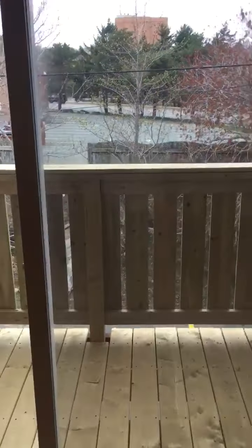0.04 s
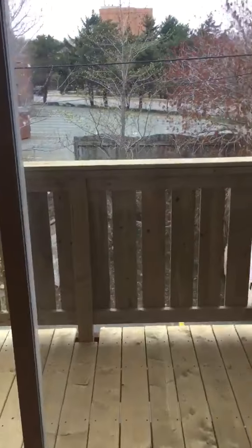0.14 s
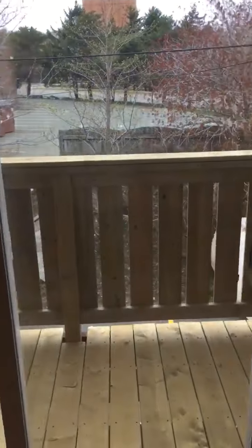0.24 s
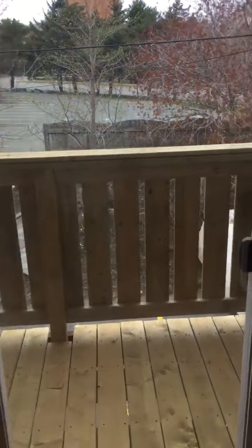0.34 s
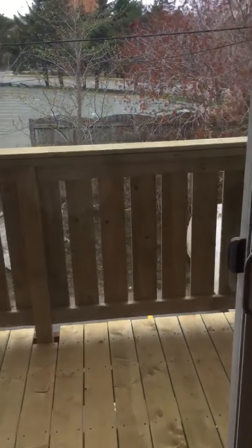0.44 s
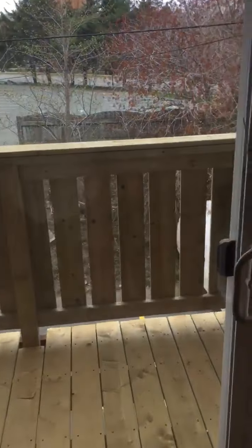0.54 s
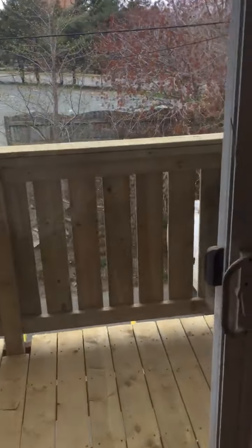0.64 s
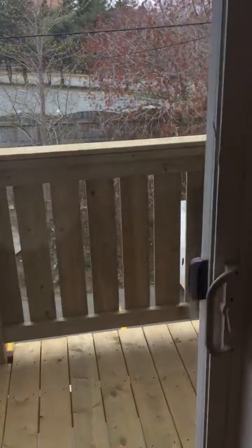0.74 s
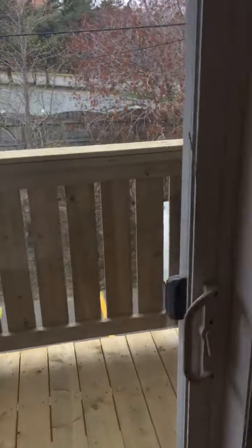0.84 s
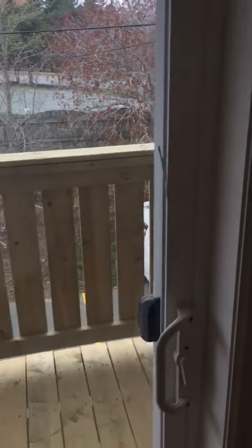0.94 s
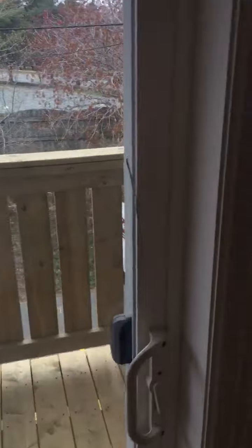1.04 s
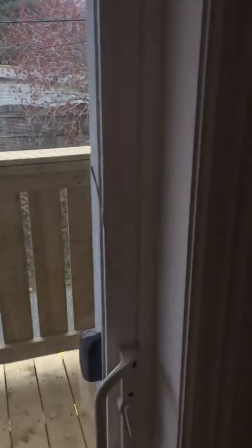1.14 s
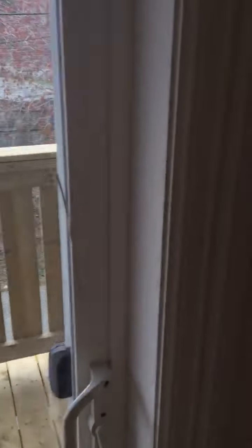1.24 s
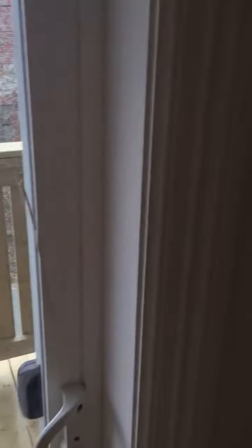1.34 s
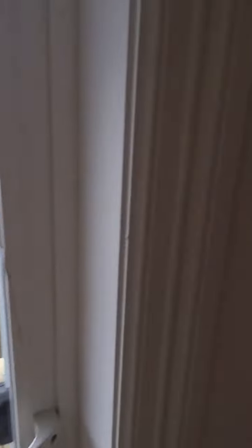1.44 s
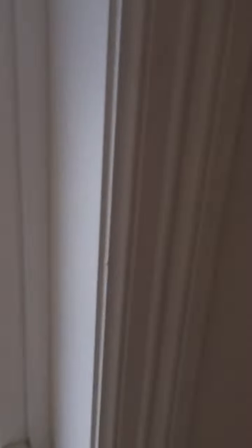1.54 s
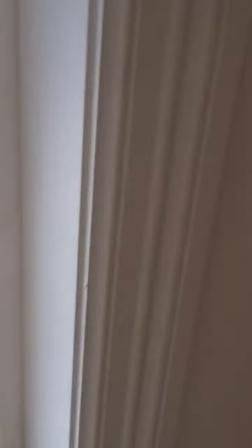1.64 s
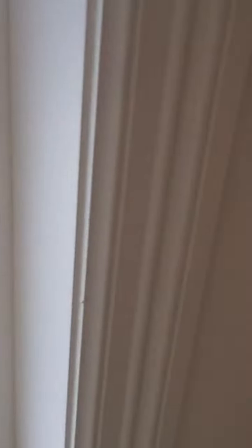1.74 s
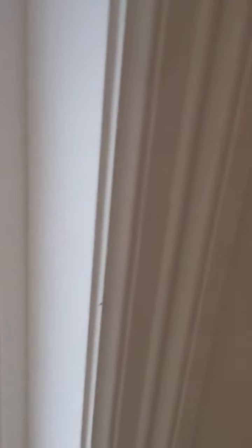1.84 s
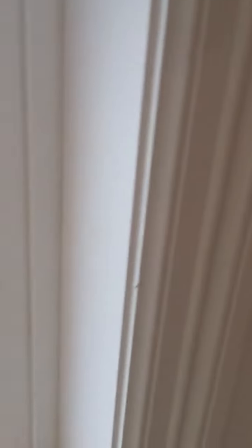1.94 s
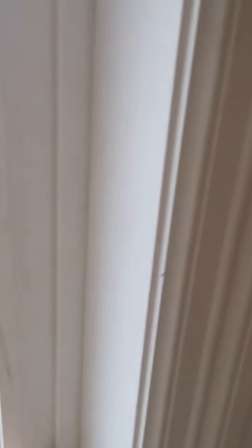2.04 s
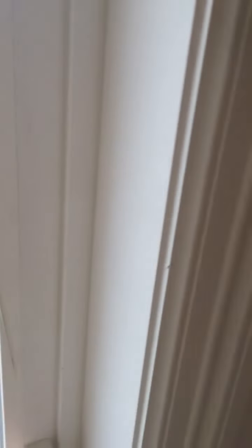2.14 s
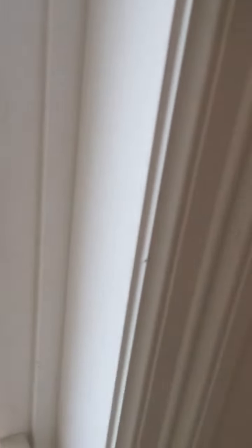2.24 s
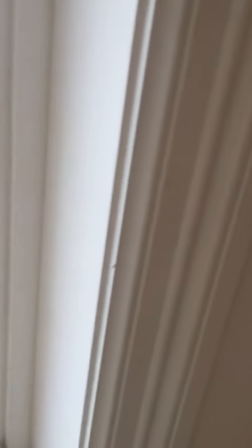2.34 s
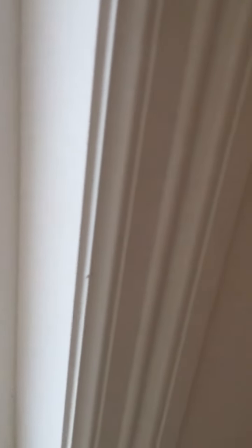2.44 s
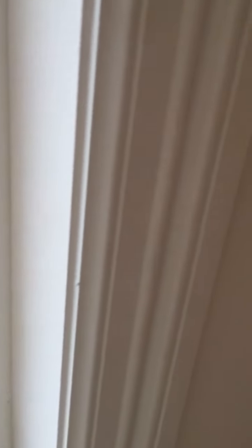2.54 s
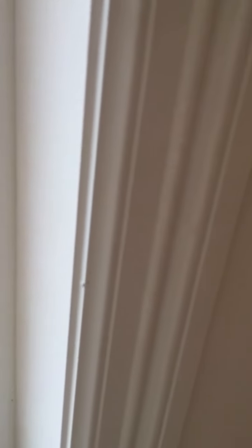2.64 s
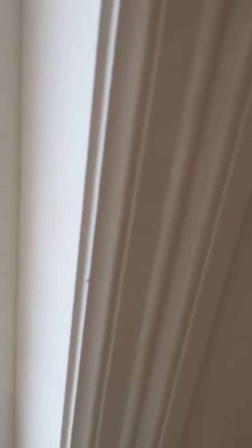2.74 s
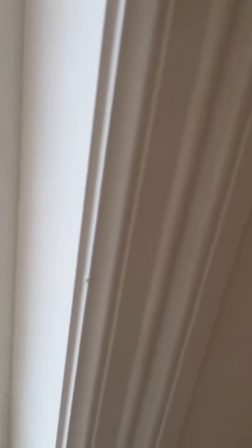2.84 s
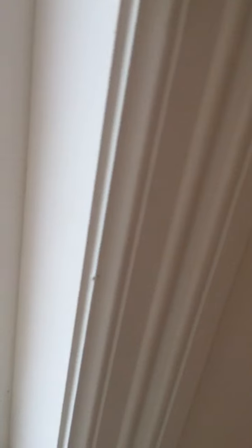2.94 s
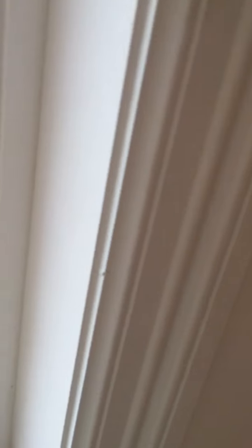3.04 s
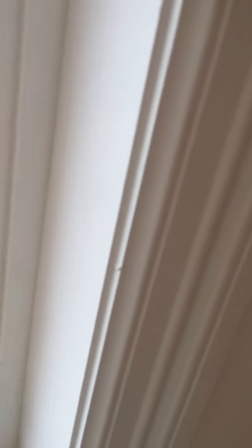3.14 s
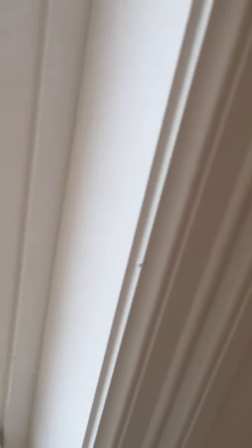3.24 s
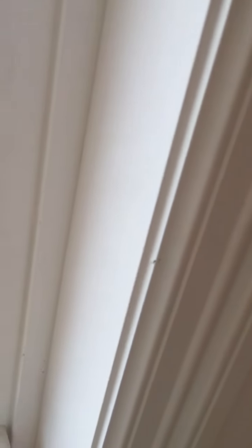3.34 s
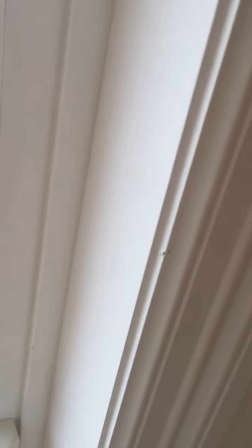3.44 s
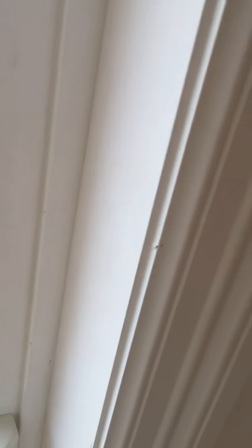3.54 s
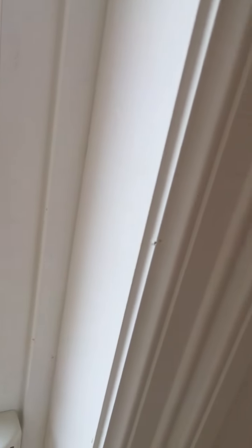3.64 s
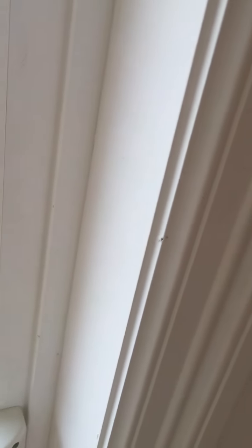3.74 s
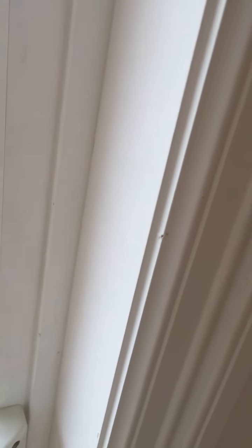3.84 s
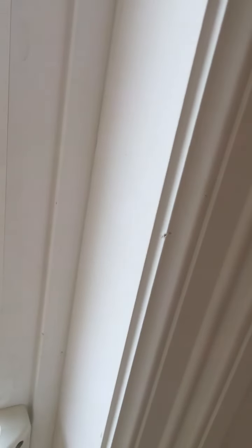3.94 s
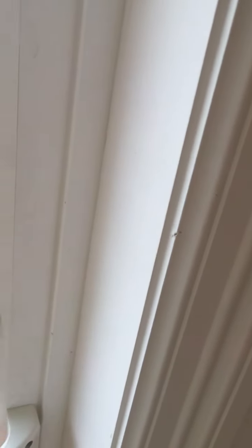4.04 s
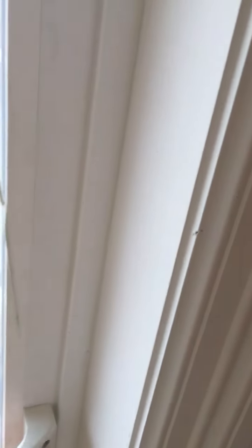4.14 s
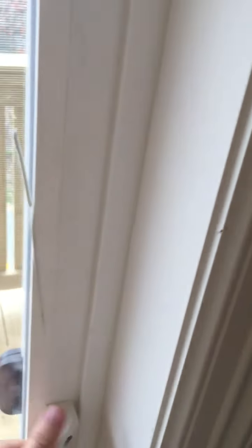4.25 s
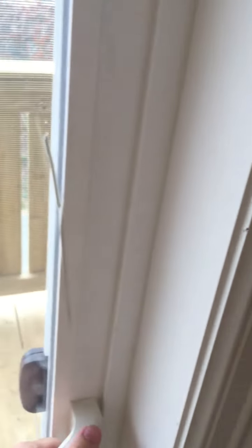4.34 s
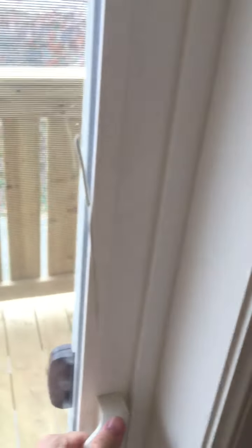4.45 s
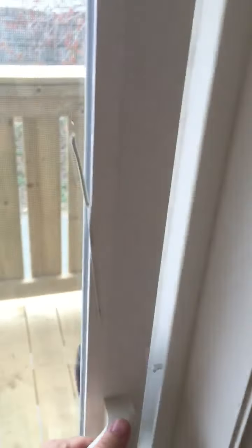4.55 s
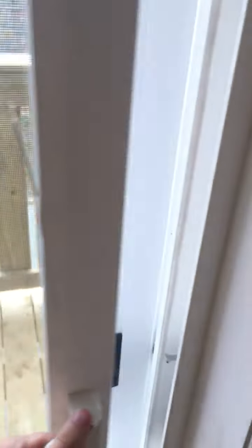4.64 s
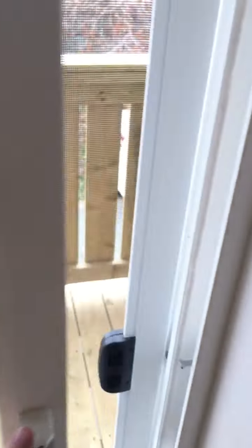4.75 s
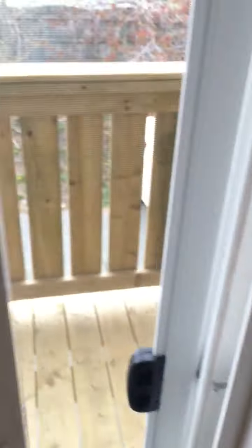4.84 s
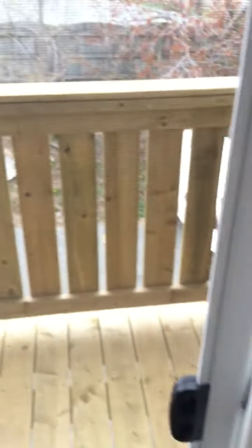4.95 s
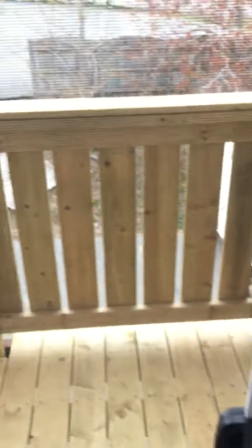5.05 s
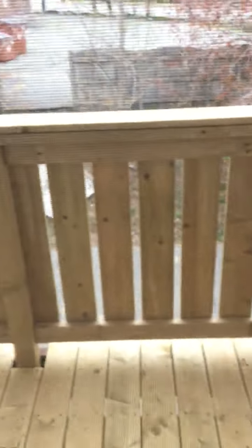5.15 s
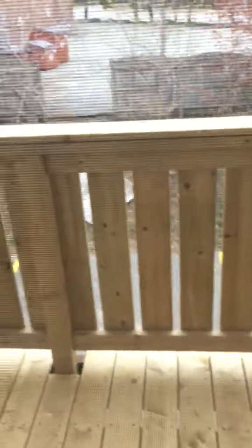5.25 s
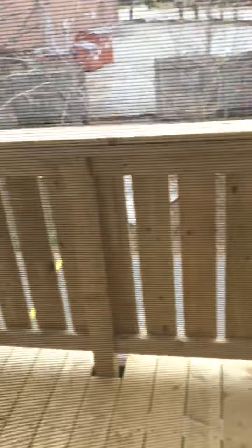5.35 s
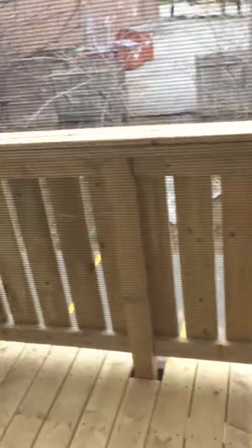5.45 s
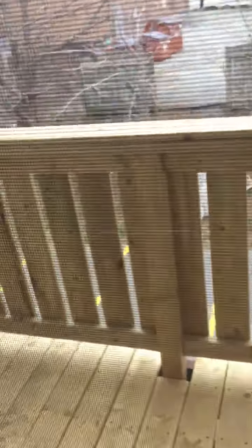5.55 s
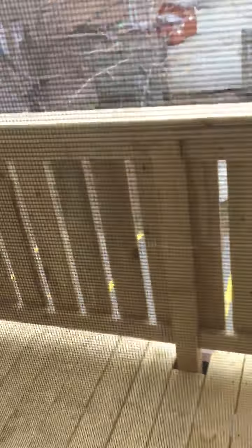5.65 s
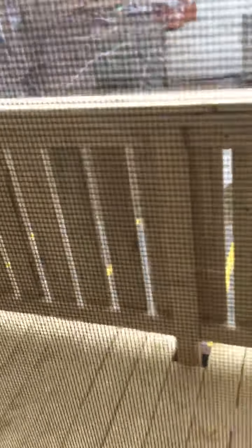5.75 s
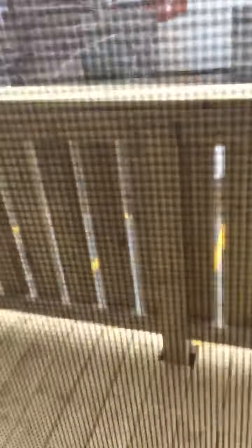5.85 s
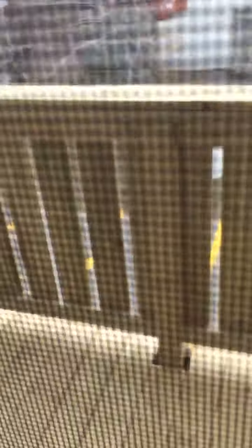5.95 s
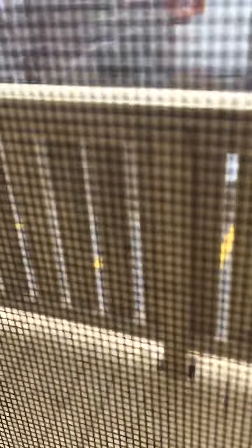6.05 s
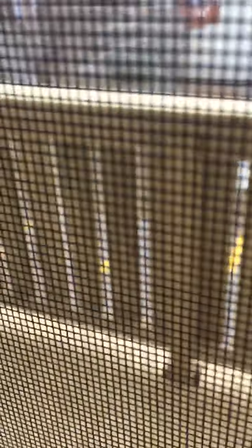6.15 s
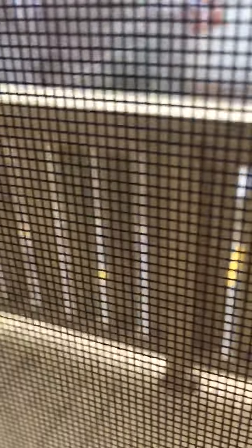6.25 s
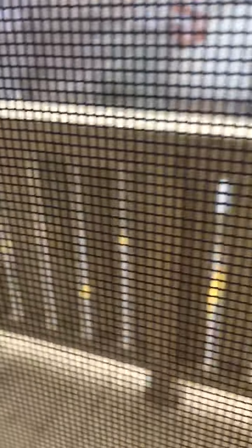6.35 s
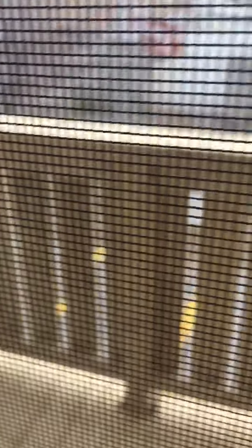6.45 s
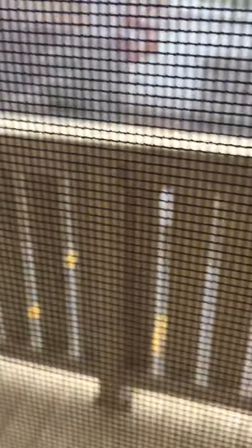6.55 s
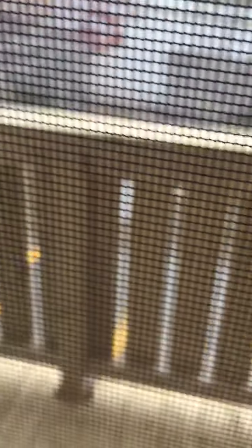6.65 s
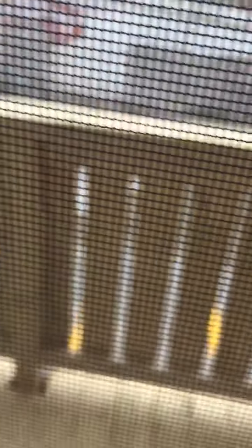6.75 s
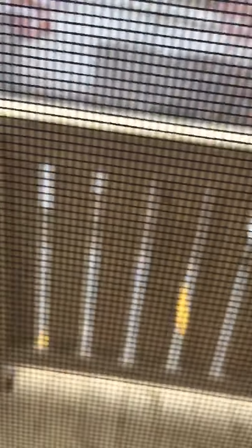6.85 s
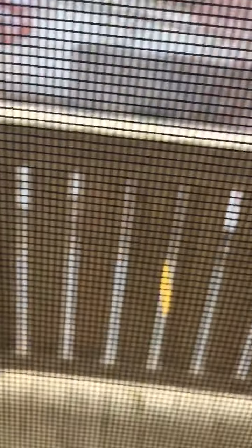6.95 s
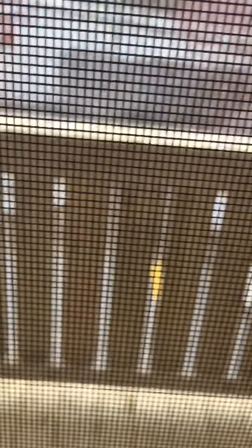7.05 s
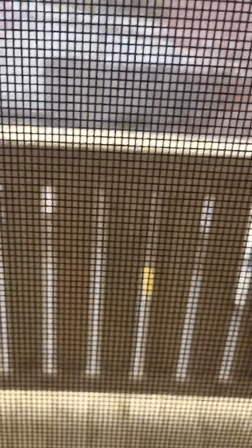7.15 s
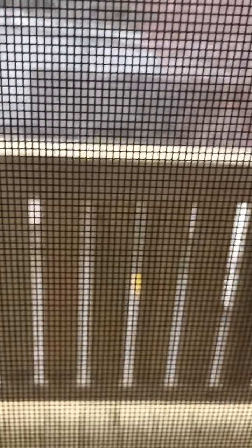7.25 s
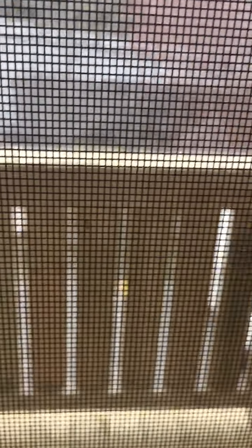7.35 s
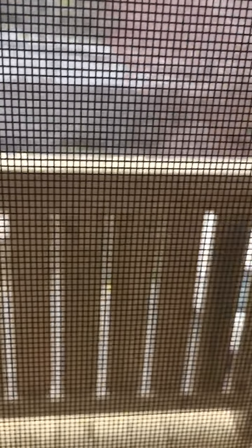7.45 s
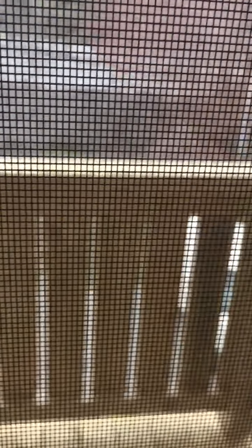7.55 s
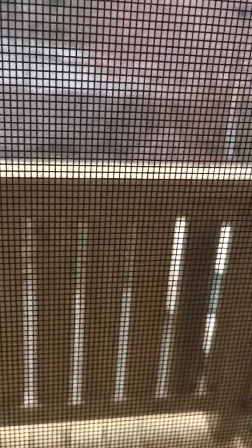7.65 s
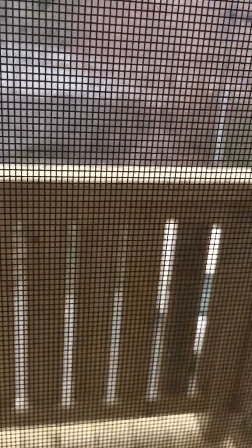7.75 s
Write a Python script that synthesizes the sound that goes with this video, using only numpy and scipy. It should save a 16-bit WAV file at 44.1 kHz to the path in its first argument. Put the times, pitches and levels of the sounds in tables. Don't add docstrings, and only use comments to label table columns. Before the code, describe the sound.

A quiet, bare room with hard floor and bright echo, heard through one close handheld microphone. From 0 to 0.3 s come soft bumps and scuffs; at about 0.65 s a heavier step booms in the boards, with another lighter, scuffing step near 1.35 s. At 2.15 s a sharp hollow knock at the handle echoes, followed by finger rubs and small clicks and bumps around 2.75, 3.1, 3.4, 3.75 and 4.1 s. At 4.65 s the latch and seal break with a loud metallic crack and short ring; the door rolls with grinding rumble and hiss, squeals faintly near 5.3 s, and bangs its stop at 5.7 s. Traffic hum and tyre hiss now fill the background. Cloth and mesh rustle and crackle until 6.5 s, a gearbox whine passes around 6.5-7.2 s, a car approaches, and the screen frame buzzes around 7.35 s, with a last light brush at 7.64 s.

```python
import sys
import numpy as np
from scipy import signal
from scipy.fft import rfft, irfft
from scipy.io import wavfile
from scipy.ndimage import uniform_filter1d

SR = 44100
rng = np.random.default_rng(int(sys.argv[2]) if len(sys.argv) > 2 else 0)


def to_wav(sig):
    pcm = np.clip(np.atleast_2d(sig), -1, 1) * 32767
    pcm = np.round(pcm).astype(np.int16)
    wavfile.write(sys.argv[1], SR, pcm.T)


def volts_from_decibels(level):
    exponent = np.asarray(level, float) / 20
    return 10 ** exponent


N = 344421
T = np.arange(N) / SR


def level(x, db):
    return x * volts_from_decibels(db) / np.sqrt(np.mean(x ** 2))


def peak(pair, db):
    return pair * volts_from_decibels(db) / np.max(np.abs(pair[0]))


def noise():
    return rng.standard_normal(N)


def coloured(x, colour, lo_hz=10, hi_hz=20000):
    f = np.maximum(np.arange(len(x) // 2 + 1) * SR / len(x), 1)
    hz, db = np.transpose(colour)
    shape = volts_from_decibels(np.interp(np.log(f), np.log(hz), db))
    edges = 1 / np.sqrt((1 + (lo_hz / f) ** 6) * (1 + (f / hi_hz) ** 6))
    return level(irfft(rfft(x) * shape * edges, len(x)), 0)


def resonate(x, hz, width):
    return signal.lfilter(*signal.iirpeak(hz, hz / width, fs=SR), x)


def steep(x, hz, width):
    return resonate(resonate(x, hz, width), hz, width)


def walk(rate):
    k = int(SR / rate)
    held = np.repeat(rng.standard_normal(N // k + 1), k)
    return 0.69 * uniform_filter1d(uniform_filter1d(held, k), k)[:N]


def gritty(grit_db):
    sizes = np.minimum(rng.exponential(size=N // 16 + 1), 4)
    return noise() * volts_from_decibels(grit_db * np.repeat(sizes, 16)[:N])


def swell(s, hold, db, rise, fall):
    gain = np.zeros(N)
    heard = (T > s - 80 / rise) & (T < s + hold + 80 / fall)
    t = T[heard]
    gain[heard] = volts_from_decibels(db - rise * np.maximum(s - t, 0) - fall * np.maximum(t - s - hold, 0))
    return gain


def columns(table):
    s, db = np.transpose(table)
    gate = np.clip(1 + np.minimum((T - s[0]) / .01, (s[-1] - T) / .02), 0, 1)
    return gate, np.interp(T, s, db)


def tones(rows):
    air = noise()
    return sum(level(steep(air, hz, width), 0) * swell(s, hold, db, rise, fall)
               for s, hold, db, hz, width, rise, fall in rows)


def add(mix, s, pair, room_db):
    i = int(max(s, 0) * SR)
    n = min(pair.shape[1], N - i)
    mix[0, i:i + n] += pair[0, :n]
    mix[1, i:i + n] += pair[1, :n] * volts_from_decibels(room_db)


def chance():
    return rng.standard_normal(8192)


def contact_pair(rough, contact):
    age = np.arange(len(rough)) / SR / max(contact, .0002)
    force = rough * np.exp(-age) * np.minimum(4 * age + .3, 1)
    force[:2] += 3.06 * np.exp(-contact / 0.013) * np.array([1, .5])
    return np.array([force, (age == 0) * np.sqrt(np.sum(force ** 2))])


# freq_hz, density_db (per Hz)
QUIET_COLOUR = [(15, -33), (25, -13), (74, 32), (170, -13), (242, 25), (936, -37), (1160, -8), (1440, -46),
                (6050, -70), (6740, 3), (11000, -30), (16000, 2)]


def quiet():
    return coloured(noise(), QUIET_COLOUR) * volts_from_decibels(-71.5 + 0.6 * walk(6.1))


# start_s, hold_s, level_db, pitch_hz, width_hz, rise_db_per_s, fall_db_per_s
CIRCUIT = (0, 8, -93, 11300, 250, 150, 150)


def circuit():
    return tones([CIRCUIT])


# time_s, level_db
STREET = [
    (4.6, -7),
    (5.6, 1),
    (6.25, 3),
    (6.5, -1.5),
    (6.95, 0.5),
    (7.3, 2),
    (7.81, -1),
]
# freq_hz, density_db (per Hz)
STREET_COLOUR = [(18, -36), (30, -86), (55, -6), (124, 7.5), (295, 2), (499, -15.5), (780, -14.5),
                 (889, -10.5), (1910, -18), (2290, -19.5), (2900, -27), (11700, -57.5), (16000, -55)]


def street():
    gate, open_db = columns(STREET)
    hum = coloured(noise(), STREET_COLOUR, hi_hz=490) * volts_from_decibels(-52 + .5 * open_db + 0.34 * walk(5.4))
    tyres = coloured(noise(), STREET_COLOUR, lo_hz=463) * volts_from_decibels(-53 + open_db + 1.2 * walk(9))
    unsteady = T > 6.71
    hz = 1637 - 1900 * np.clip(T - 6.98, 0, .5) ** 2
    hz = hz * (1 + (.0015 + .012 * unsteady) * walk(60))
    whine = np.sin(2 * np.pi * np.cumsum(hz) / SR) * volts_from_decibels(1.5 * walk(12) - 5 * unsteady)
    whine *= swell(6.5, .2, -56, rise=25, fall=8) * np.clip((7.32 - T) / .1, 0, 1)
    road = noise()
    car = level(steep(road, 1164, 280), -53.5)
    car += level(steep(road, 2160, 200), -78) + level(steep(road, 970, 120), -82)
    car *= np.clip((T - 6.8) / 1.25, 0, 1)
    return gate * (hum + tyres + whine + car)


# start_s, hold_s, level_db, pitch_hz, width_hz
TREADS = [(6.9, 0.47, -61.5, 924, 89), (6.95, 0.19, -69, 2300, 50), (7.052, 0.16, -61, 1024, 70),
          (7.305, 0.23, -59.5, 1155, 70), (7.5, .4, -61, 1012, 80), (7.62, .3, -58, 1274, 70),
          (7.7, .2, -60.5, 2207, 90)]


def treads():
    return tones([(*row, 50, 50) for row in TREADS])


# start_s, level_db
SWAY = [(0.1, -63.5), (0.65, -55.5), (1.52, -61), (2.272, -47.5), (2.87, -55), (3.31, -56), (3.48, -73),
        (4.652, -43), (5.72, -34.5), (7.8, -46)]


def sway():
    kicks = sum(swell(s, 0, db, rise=290, fall=86) for s, db in SWAY)
    steady = volts_from_decibels(-74.5) + volts_from_decibels(-61.5) * columns(STREET)[0]
    return level(steep(noise(), 56, 34), 0) * (kicks + steady)


# band_hz, t60_s, level_db
ROOM = [(61, 1.17, 3), (120.3, 0.97, 0.5), (196.8, 0.65, -2), (279, 0.88, 3), (393, 0.99, 6.5),
        (546, 1.09, 5.5), (681, 1.32, 6.5), (888, 0.87, 9), (1400, 0.59, 5.5), (2000, 0.32, 5),
        (3000, 0.47, 5), (5000, 0.3, 6), (6500, 0.27, 5), (12700, 0.26, -10)]


def room(x):
    t = np.arange(int(1.6 * SR)) / SR
    density = np.clip((t / .025) ** 2, 0, 1)
    echoes = rng.standard_normal(len(t)) * (rng.random(len(t)) < density) / np.sqrt(density + 0.0096)
    echoes *= 1 + 3.07 * np.exp(-t / 0.0071)
    tail = sum(level(steep(echoes * volts_from_decibels(-60 * t / t60), hz, .5 * hz), db) * np.sqrt(hz)
               for hz, t60, db in ROOM)
    return signal.fftconvolve(x, tail / np.sqrt(np.sum(tail ** 2)))[:N]


# start_s, level_db, pitch_hz,
# width_hz, fall_db_per_s
HUMS = [(.075, -59.5, 3440, 1600, 69), (.14, -64, 2520, 900, 70), (.28, -68, 272, 30, 37),
        (.63, -46, 194, 40, 59), (1.45, -59.5, 365.6, 30, 25), (2.16, -44.5, 905, 88, 28),
        (2.16, -43, 1400, 300, 35.5), (3.12, -67, 6500, 300, 89), (3.15, -61.5, 3000, 810, 62),
        (3.3, -55, 1250, 500, 70), (3.755, -52.5, 135, 30, 48), (4.13, -53, 1060, 400, 59),
        (7.39, -74, 3600, 118, 42), (7.39, -70, 5940, 100, 60), (7.39, -75, 9420, 200, 90)]


def panels():
    return tones([(s, 0, db, hz, width, 2500, fall) for s, db, hz, width, fall in HUMS])


# start_s, hold_s, hiss_db, fine_hiss_db, scrape_db
SCUFFS = [(0.005, 0.018, -74, -69, -97), (.075, 0.11, -74, -102, -50.5), (.625, 0.056, -58, -64.5, -54),
          (.799, 0.0071, -88, -95, -50), (.975, 0.041, -94, -65, -70), (1.36, 0.13, -54, -50.5, -55),
          (1.338, 0.016, -78, -64, -78), (1.52, .06, -64.5, -68, -71), (1.66, 0.15, -75.5, -83, -84),
          (1.82, 0.042, -87, -73, -81), (5.73, .12, -41.5, -52, -38), (5.9, 0.16, -46, -52, -41.5),
          (6.19, 0.3, -54.5, -65, -52), (6.852, .01, -68, -79, -56.5), (7.11, .01, -76, -89, -75),
          (7.32, 0.031, -59.5, -62, -56), (7.64, 0.009, -69, -86, -72)]
# start_s, hold_s, hiss_db, fine_hiss_db, scrape_db
FINGERS = [(1.99, 0.1, -54.5, -51, -60), (2.13, 0.0065, -43.5, -51, -35), (2.16, 0.11, -49.5, -72, -69),
           (2.305, 0.13, -55.5, -60.5, -48), (2.48, 0.15, -110.5, -108, -60.5),
           (2.76, 0.015, -68, -70, -57), (2.975, 0.1, -83, -77, -101), (3.125, 0.027, -56, -86, -56),
           (3.265, 0.023, -96, -88, -72), (3.3, 0.069, -94, -73, -79), (3.43, .01, -90, -86, -74),
           (3.94, 0.028, -73, -102, -68), (4.12, 0.017, -96, -79, -55)]
# hiss_db, fine_hiss_db, scrape_db
RUSTLE_DB = (-75.5, -79.5, -74.5)
# freq_hz, density_db (per Hz)
RUB_COLOUR = [(1180, -7), (2000, 3), (2620, 2), (2830, 2), (3740, 0), (6420, 1), (7380, -4.5), (12100, -15),
              (16000, -10.5)]
FLUTTER_HZ = (3950, 5600)


def rubs():
    grain, jerks = gritty(1.6), walk(30)
    flutter = T > 5.85
    mesh = flutter * sum(resonate(grain, hz, 560) for hz in FLUTTER_HZ)
    quick_jerks = np.tile(jerks[::2], 2)[:N]
    hiss = coloured(grain + mesh, RUB_COLOUR, 1760, 5600) * volts_from_decibels((-1.9 + 3.5 * flutter) * quick_jerks)
    fine = coloured(grain, RUB_COLOUR, lo_hz=9200) * volts_from_decibels(1.5 * jerks)
    scrape = level(steep(gritty(1.84), 1003, 1240), 0) * volts_from_decibels(1.8 * walk(35))
    out = np.zeros(N)
    for k, (grade, fall) in enumerate([(hiss, 152), (fine, 310), (scrape, 100)]):
        strokes = volts_from_decibels(RUSTLE_DB[k])
        for table, rise in [(SCUFFS, 1250), (FINGERS, 1080)]:
            strokes = strokes + sum(swell(s, hold, db[k], rise, fall) for s, hold, *db in table)
        out += grade * strokes
    return out


# pitch_hz, level_db
SCREEN = [(1650, 2.5), (2130, 2), (2730, -7), (3640, -5), (4600, -10), (5850, -15), (6900, -11),
          (9420, -23)]
# start_s, hold_s, level_db
RATTLES = [(6.852, 0.012, -52), (7.096, .01, -56), (7.319, 0.017, -48), (7.333, 0.0066, -49),
           (7.355, .008, -54), (7.374, 0.0091, -50), (7.4, .006, -63), (7.425, .006, -54),
           (7.485, .01, -55.5), (7.637, 0.01, -55)]


def screen():
    grain = gritty(2.3)
    buzz = sum(level(steep(grain, hz, 150), db) for hz, db in SCREEN)
    return level(buzz, 0) * sum(swell(s, hold, db, rise=2200, fall=830) for s, hold, db in RATTLES)


# start_s, peak_db, boom_hz, slap_db (re boom), room_db
THUDS = [(0.009, -40, 234, -16, -16), (0.146, -35, 256, -6, 6), (0.263, -34, 320, -14, -8),
         (0.62, -19, 280, 4, 2), (0.675, -16.5, 210, -12, -6), (1.334, -31.5, 183, -6, 9.5),
         (1.421, -30.5, 337, -21, 3), (1.981, -43, 224, -16, 4.5), (2.166, -26, 136, 10, 4.5),
         (2.753, -30.5, 242, 1, 0), (2.809, -29, 130, -17, -2.5), (3.108, -39.5, 109, 1, 4),
         (3.419, -30, 103, -21, -4), (3.445, -32, 181, -22, 0), (3.743, -29, 122, -19, 1.5),
         (3.897, -37, 212, -28, 10), (4.632, -14, 377, -14, -5.5), (4.689, -22, 97, -1, -3.5),
         (5.703, -15.5, 186, -21, 1), (5.715, -18.5, 142, -17, 7), (7.33, -32.5, 192, 10, 4)]


def thuds(mix):
    for s, db, hz, slap_db, room_db in THUDS:
        rough = chance()
        force = contact_pair(1 + 4.8 * rough, 0.00081)
        force[1] *= np.sum(force[0]) / force[1, 0]
        boom = steep(force, hz, 0.69 * hz) + 0.26 * steep(force, 1.61 * hz, 1.03 * hz)
        slap = steep(contact_pair(rough, 0.00094), 840, 840)
        add(mix, s, peak(boom, db - 10.0) + peak(slap, db + slap_db - 22.5), room_db)


# start_s, peak_db, boom_hz, room_db
PADS = [(.0, -48.5, 200, 3.5), (0.071, -45, 140, -11), (.1, -47.5, 250, -3), (0.146, -50, 89, -16),
        (.625, -30, 199, -10), (.7, -29, 219, -5.5), (1.431, -35.5, 145, -12.5), (1.838, -56.5, 192, -18),
        (2.022, -51, 116, 11), (2.2, -45, 140, 0), (2.42, -45, 220, -4.5), (2.868, -50, 140, -18),
        (3.25, -54, 288, -5), (3.33, -48.5, 128, -11), (3.91, -40, 314, -9.5), (3.98, -47.5, 224, -2),
        (4.13, -53.5, 119, 6.5), (6.422, -42, 110, -16)]


def pads(mix):
    for s, db, hz, room_db in PADS:
        rough = chance()
        age = np.arange(len(rough)) / SR / .02
        boom = steep(rough * age * np.exp(-age), hz, 1.02 * hz)
        add(mix, s, peak(np.array([boom, boom]), db), room_db)


# freq_hz, width_hz, level_db
HARDWARE = [(5460, 1700, 45), (9700, 650, -46), (13500, 9000, -25), (7660, 6600, 34)]


def click(db, hz, bright_db, contact, width, partner):
    crack = contact_pair(chance(), contact)
    knock = steep(crack, hz, width * hz)
    knock += .5 * steep(crack, min(partner * hz, 15000), 0.81 * hz)
    knock += 0.28 * steep(crack, 0.72 * hz, 0.95 * hz)
    small_parts = sum(volts_from_decibels(d) * resonate(crack, f, w) for f, w, d in HARDWARE)
    return peak(knock, db) + peak(steep(small_parts, 21700, 17100), db + bright_db)


# start_s, peak_db, knock_hz, contact_s, room_db
CLICKS = [(2.05, -48, 2000, 0.016, 7), (2.078, -45, 1370, 0.025, 5), (2.134, -30, 830, 0.0078, -41),
          (2.752, -36.5, 1100, 0.00015, 4.5), (3.105, -32, 1260, 0.0078, -14),
          (3.435, -45.5, 1250, 0.0022, -16), (3.896, -41.5, 1550, 0.0015, 1),
          (4.652, -9.5, 1350, 0.0014, -7), (4.66, -13, 1620, 0.0023, -37), (4.681, -21, 2020, 0.0032, -17),
          (5.711, -16.5, 740, 0.0063, -1.5), (7.32, -36.5, 1730, 0.019, -16)]
# start_s, peak_db, knock_hz, contact_s, room_db
KNOCKS = [(0.074, -58, 1400, 0.0067, 12), (0.264, -37.5, 400, 0.0048, -18), (1.332, -48, 830, 0.0035, -9),
          (2.144, -16.5, 1550, 0.0047, -1), (2.146, -20, 845, 0.01, -9), (3.745, -46, 790, 0.0015, -9),
          (3.286, -33, 1540, 0.00044, -3), (3.989, -38.5, 1400, 0.00041, 3),
          (4.118, -32, 1470, 0.0036, -15), (4.607, -25.5, 1110, 0.005, -0.5),
          (5.698, -9.5, 1400, 0.0011, 3), (5.703, -7.5, 1400, 0.0085, -7.5), (5.716, -24, 940, 0.0013, -7),
          (7.38, -41, 1700, 0.0032, -13)]
# start_s, peak_db, knock_hz, contact_s, room_db
PANE = [
    (3.743, -46, 540, 0.0031, -21),
    (3.905, -37.5, 295, 0.0038, -2.5),
    (5.706, -19, 257, 0.0069, 0.5),
]


def knocks(mix):
    for table, bright_db in [(CLICKS, -6), (KNOCKS, -64), (PANE, -64)]:
        for s, db, hz, contact, room_db in table:
            add(mix, s, click(db, hz, bright_db, contact, width=0.36, partner=1.376), room_db)


# start_s, peak_db, pitch_hz, contact_s, room_db
TICKS = [(.263, -50, 2700, 0.0016, -11), (.291, -34, 2360, 0.00074, -14), (0.799, -41, 2950, 0.00059, -17),
         (1.974, -76, 6280, 0.0013, -13), (2.144, -19.5, 9700, 0.0015, -4), (2.484, -37, 2640, 0.0022, -23),
         (3.112, -23.5, 3300, 0.0033, -17), (3.138, -47, 3000, 0.0033, -7), (3.9, -45, 3300, 0.0022, -15),
         (4.153, -52, 8400, 0.002, -30), (5.703, -12.5, 3120, 0.0037, -20),
         (4.66, -9.5, 3320, 0.00078, -33), (4.682, -23.5, 4200, 0.0021, -2),
         (6.305, -37.5, 3850, 0.0025, -11), (6.449, -77, 3830, 0.0072, 3), (6.521, -52, 4020, 0.011, -14),
         (6.852, -47.5, 3620, 0.011, -6), (6.90, -69, 5980, 0.006, 6), (7.1, -55, 6500, 0.0065, 5.5),
         (7.316, -43, 3700, 0.0056, -23), (7.375, -51, 4280, 0.003, -15), (7.43, -47, 3500, .005, -10),
         (7.645, -59, 6900, .016, 4.5), (3.989, -56, 2500, .001, -12), (4.131, -58, 8600, .002, -20),
         (4.361, -63, 6400, .002, -20), (4.384, -65, 7000, .001, -20), (6.192, -48, 5200, 0.0022, -21),
         (6.262, -46, 3990, .002, -2), (6.355, -52, 5600, .002, -19), (6.413, -64, 4100, .001, -16),
         (6.426, -49, 3900, .001, -16), (6.442, -44, 3730, .0015, -17), (6.496, -63, 4000, 0.0037, -13),
         (7.317, -54, 6400, .003, -20), (7.373, -59, 4370, 0.0036, -17), (7.487, -51, 3540, .004, -10)]


def ticks(mix):
    for s, db, hz, contact, room_db in TICKS:
        add(mix, s, click(db, hz, -9.5, contact, width=.2, partner=1.75), room_db)


# start_s, peak_db, pitch_hz, length_s
SQUEAKS = [(6.513, -54, 6500, 0.002), (6.604, -55.5, 8500, 0.036), (6.76, -61, 10600, 0.015),
           (7.432, -55, 5900, 0.0045), (3.287, -39, 5500, .0006), (3.285, -41, 6600, .0006),
           (3.287, -46, 9700, 0.00045), (3.987, -52, 5500, .0006), (3.989, -55, 7100, .0006)]


def squeaks(mix):
    for s, db, hz, length in SQUEAKS:
        width = max(.025 * hz, .45 / length)
        add(mix, s, peak(steep(contact_pair(chance(), length), hz, width), db), -14)


# start_s, peak_db, pitch_hz, contact_s, room_db
TAPS = [(.08, -45, 2400, 0.017, -12), (.142, -51, 2640, 0.0086, -11), (.186, -58, 2360, .01, -1),
        (0.265, -52, 1270, .003, 2), (.264, -53, 2700, .002, -8), (0.797, -41.5, 2930, .002, -16),
        (1.335, -40.5, 915, 0.0015, -9), (1.987, -54, 816, 0.006, -12), (2.097, -37, 1300, 0.0056, -1),
        (3.113, -32.5, 2300, 0.00035, -1), (3.14, -46, 1100, 0.0018, -12), (3.146, -54, 385, 0.01, -6),
        (3.288, -32.5, 1260, .001, -8), (3.287, -34, 1840, 0.00035, -2), (3.302, -40.5, 1230, 0.0036, -9),
        (3.436, -63, 810, .002, -13), (3.445, -44.5, 568, .004, -27), (3.744, -47, 780, 0.0019, -19),
        (3.989, -44, 980, 0.0018, -22), (4.119, -39.5, 830, 0.0018, -14), (4.132, -32.5, 1240, 0.0037, -11),
        (4.665, -24, 1290, 0.0026, -8)]
# start_s, peak_db, pitch_hz, contact_s, room_db
MESH = [(6.053, -56, 9500, .003, -10), (6.184, -56, 9700, .003, -7), (6.224, -51, 9350, .004, -3),
        (6.284, -54, 9500, .002, -11.5), (6.305, -45, 9700, 0.0025, 0), (6.373, -53, 9100, .003, -12),
        (6.39, -44, 9300, .004, -15), (6.487, -63, 9600, 0.0072, -10), (6.512, -46, 3900, .003, -4),
        (6.535, -42, 3880, .003, -7), (6.595, -65, 9600, 0.0023, -4), (1.332, -44, 1240, 0.0016, -16),
        (1.363, -50, 2500, .004, -10), (6.414, -53, 9600, .002, -11), (6.24, -52, 9600, .002, -6),
        (3.896, -38, 5800, 0.00032, -20), (4.634, -22, 3900, .0005, -25)]


def taps(mix):
    for s, db, hz, contact, room_db in TAPS + MESH:
        add(mix, s, peak(steep(contact_pair(chance(), contact), hz, 0.21 * hz), db), room_db)


# pitch_hz, level_db, t60_s
LATCH = [(5496, 3, .16), (6481, -13, .1), (9787, -2, .05), (11690, 0, .1), (12040, -8, .06),
         (14800, -2, .1)]


def latch(mix):
    t = np.arange(8192) / SR
    ring = sum(volts_from_decibels(db) * np.sin(2 * np.pi * hz * t) * volts_from_decibels(-60 * t / t60) for hz, db, t60 in LATCH)
    add(mix, 4.681, np.array([ring, ring]) * volts_from_decibels(-34), -15)


def hits():
    mix = np.zeros((2, N))
    for strike in (thuds, pads, knocks, ticks, squeaks, taps, latch):
        strike(mix)
    return mix


# start_s, hold_s, level_db, pitch_hz, width_hz, rise_db_per_s, fall_db_per_s
SQUEAL = (5.26, .08, -49, 5350, 170, 150, 150)


def squeal():
    return tones([SQUEAL])


TRACK_HZ = (380, 620, 900, 1260, 1700, 2300, 3100, 4200, 5300, 6500, 8500)


def patchy(x, bumps):
    slow = level(uniform_filter1d(bumps, SR // 15), 0)
    return x + sum(resonate(x, hz, hz / 7) * (volts_from_decibels(1.8 * np.roll(slow, 311 * hz)) - 1) for hz in TRACK_HZ)


# time_s, load_db
ROLL = [
    (4.5, -37.5),
    (4.6, -4),
    (4.654, 3),
    (4.76, -2.5),
    (5.19, -0.5),
    (5.32, -0.5),
    (5.49, -3.5),
    (5.66, -6),
    (5.8, 0),
]
# freq_hz, density_db (per Hz)
ROLL_COLOUR = [(18, -36), (30, -69), (49, -36), (109, -9), (221, 6), (336, 1), (374, 3.5), (526, -8.5),
               (937, -4.5), (2750, -8.5), (4780, -8), (5590, -4.5), (12300, -16.5), (16000, -12)]


def door():
    gate, load_db = columns(ROLL)
    bumps = walk(40)
    grind = patchy(gritty(1.3), bumps)
    rumble = coloured(grind, ROLL_COLOUR, hi_hz=540)
    rumble *= volts_from_decibels(-43.5 + 2.33 * load_db + 0.72 * bumps + 0.5 * walk(12))
    rumble *= 1 + swell(5.4, 0.46, 0.5, rise=43, fall=43)
    scrape = coloured(grind, ROLL_COLOUR, 706, 2820) * volts_from_decibels(-35 + load_db + 1.2 * bumps)
    brush = coloured(grind, ROLL_COLOUR, lo_hz=3000) * volts_from_decibels(1.1 * bumps + np.minimum(load_db + 10, 0))
    brush *= swell(4.796, 0.81, -41, rise=46, fall=25)
    return gate * (rumble + scrape + brush)


def scene():
    near, far = hits()
    rub, roll = rubs(), door()
    echo = room(far * volts_from_decibels(2.0) + rub * volts_from_decibels(-19.0) + roll * volts_from_decibels(-13.5))
    background = quiet() + circuit() + street() + treads() + sway()
    mono = background + near + rub + roll + echo + panels() + squeal() + screen()
    return np.array([mono, mono])


def band_limit(x):
    return signal.sosfilt(signal.butter(12, 16660, fs=SR, output="sos"), x)


# freq_hz, level_db
MIC = [(20, 8.5), (4000, -1), (5000, -4), (5800, -2), (7000, -3), (8200, -1), (9700, 3.5), (10600, -1),
       (12000, 4.5), (15700, -4.5), (16300, -34)]


def record(dry):
    x = coloured(dry[0], MIC) * np.sqrt(np.mean(dry[0] ** 2))
    x = signal.sosfilt(signal.butter(3, 46, "high", fs=SR, output="sos"), x)
    x = np.tanh(x / .55) * .55
    return band_limit(np.array([x, x]))


dry = scene()
out = record(dry)
to_wav(out)
```